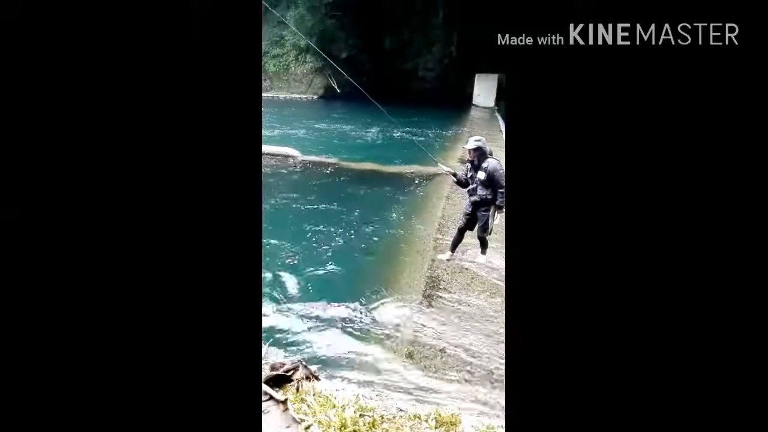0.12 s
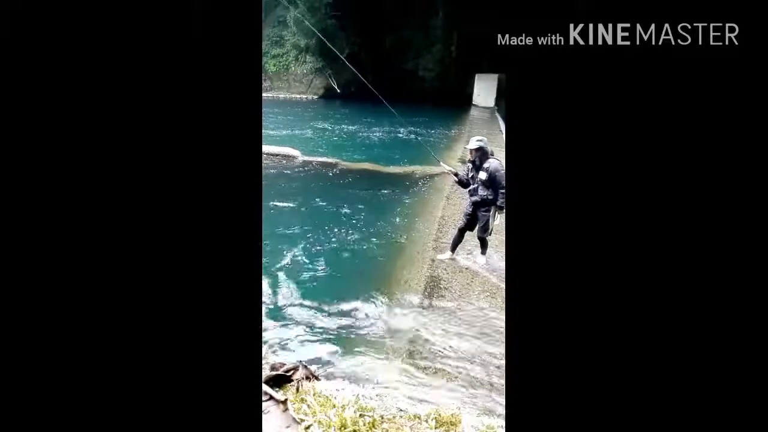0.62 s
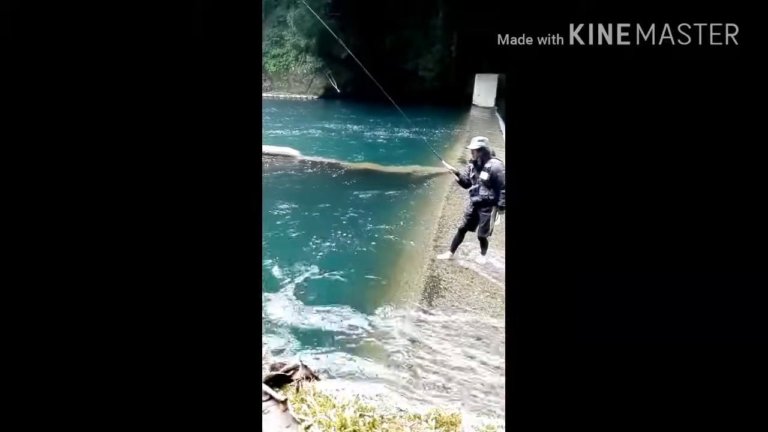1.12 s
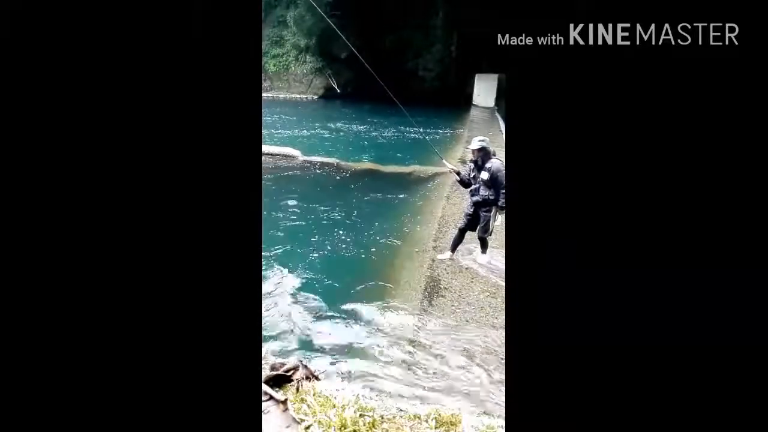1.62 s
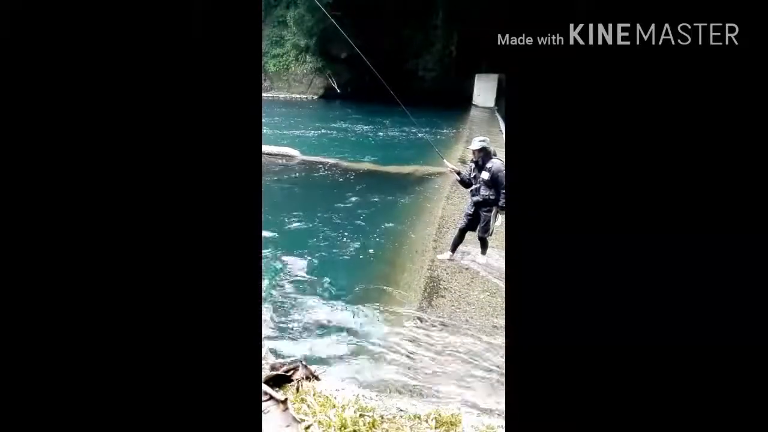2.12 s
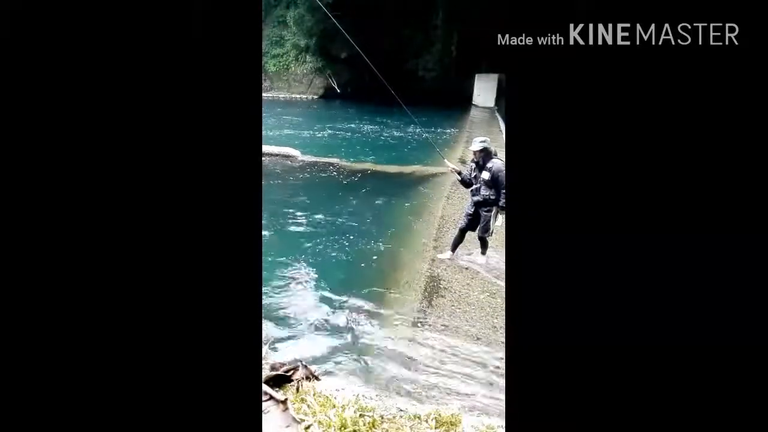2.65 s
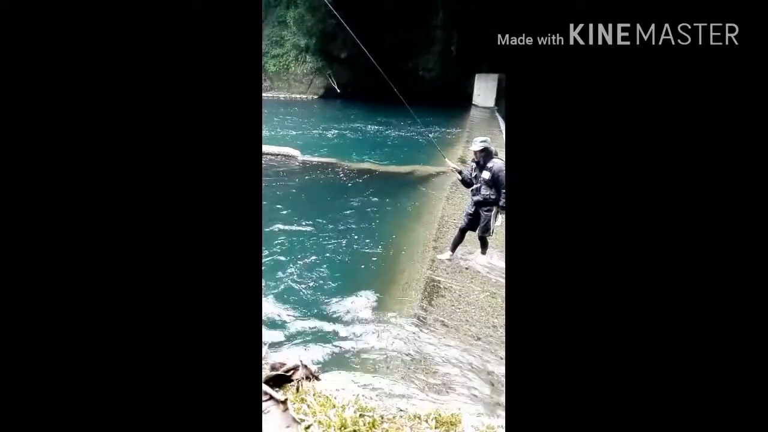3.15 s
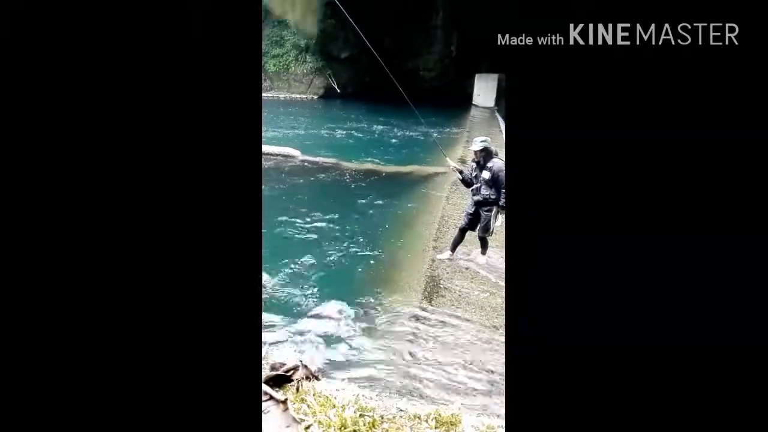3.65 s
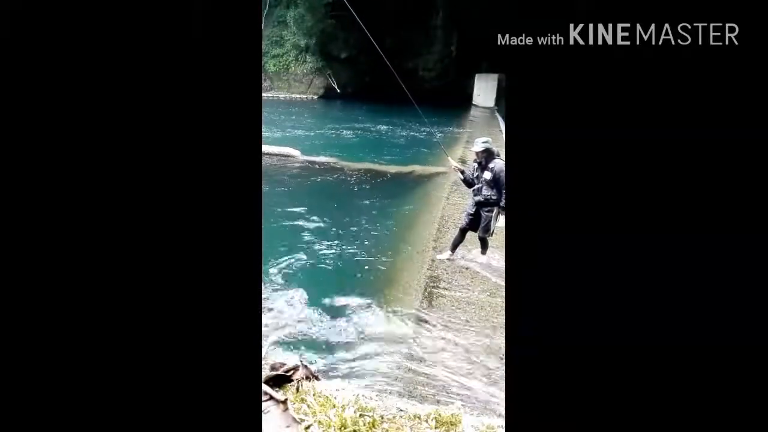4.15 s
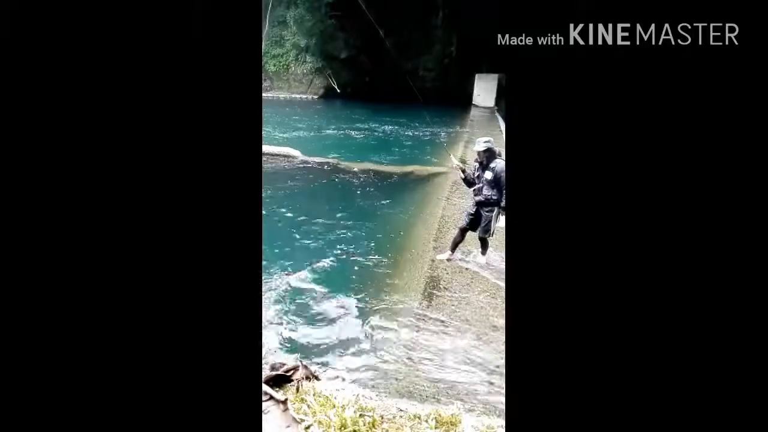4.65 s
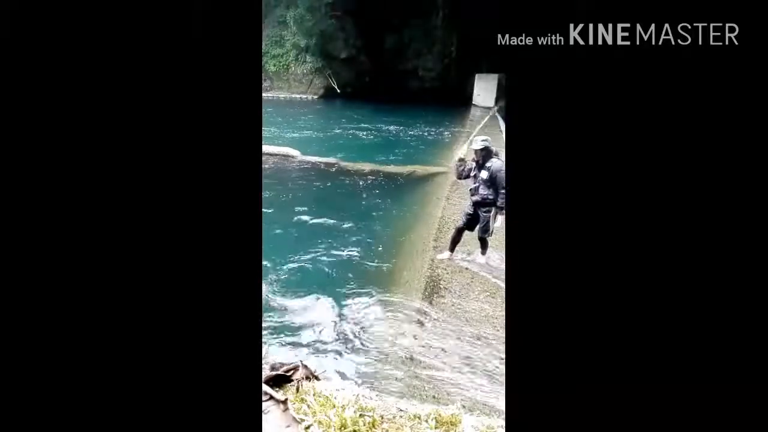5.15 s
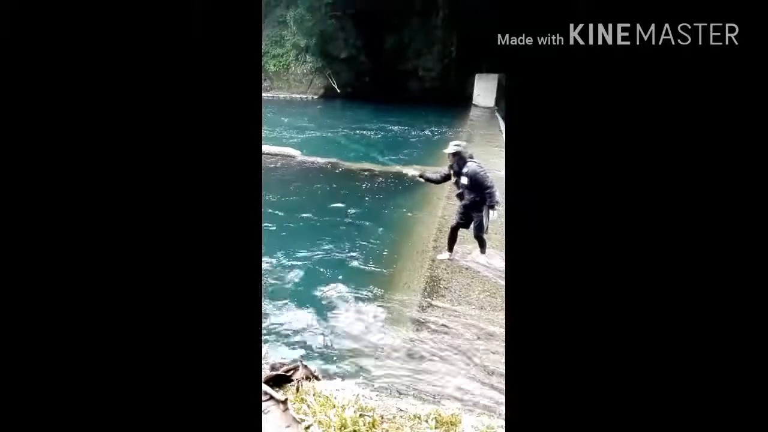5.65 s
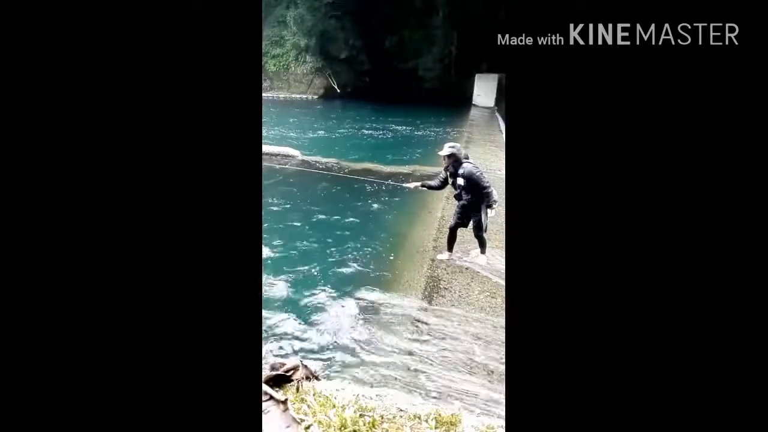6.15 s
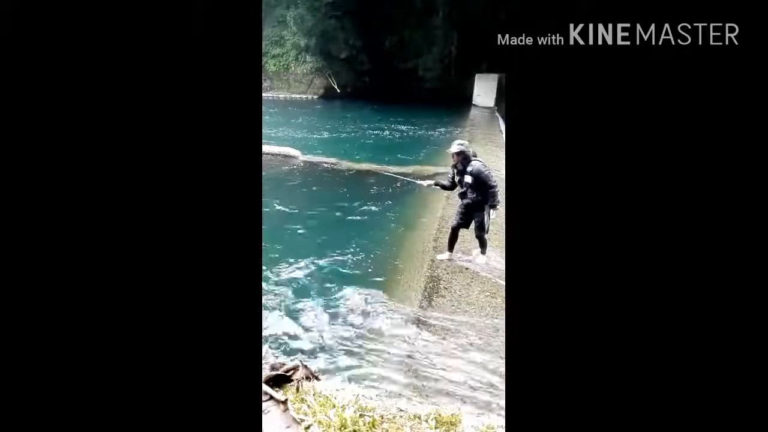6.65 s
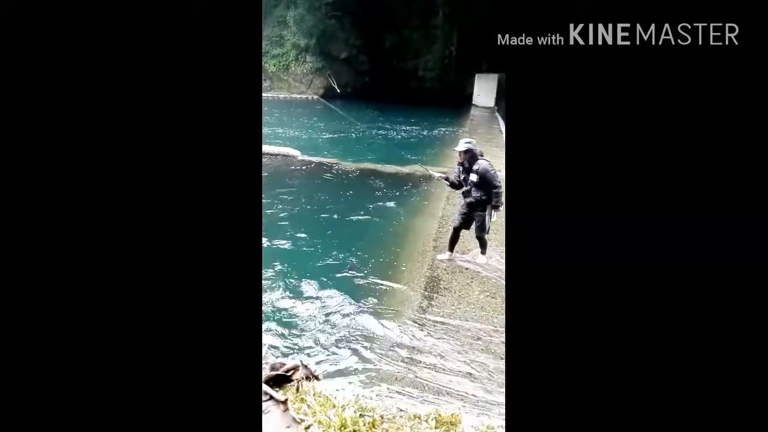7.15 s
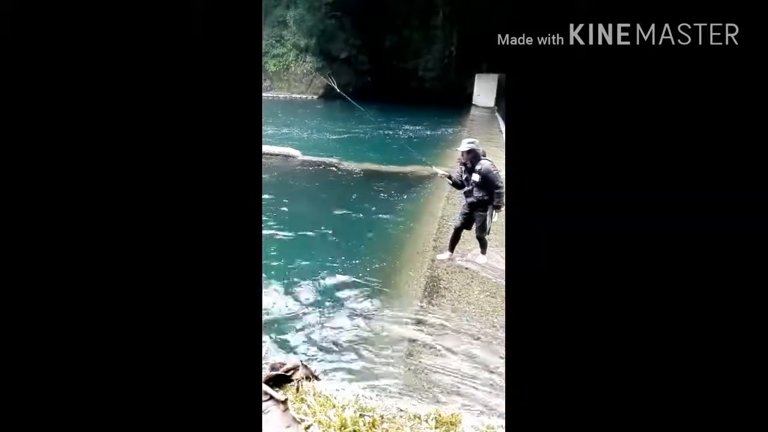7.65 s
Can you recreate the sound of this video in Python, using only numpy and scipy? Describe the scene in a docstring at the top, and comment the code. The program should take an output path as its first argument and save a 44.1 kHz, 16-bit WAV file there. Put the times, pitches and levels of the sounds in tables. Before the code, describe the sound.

From 0 seconds, a full, steady rush of river water pouring over a low weir is already under way. It is smooth, bright noise, strongest in the upper mids, with a faint fizzy grain of tiny rising bubble chirps. A quieter low rumble from the plunging sheet lies below, swelling slightly at about 0.3 seconds. A single soft thump falls near 1.4 seconds. Between 2.4 and 2.6 seconds the rumble rises and several dull, deep thuds cluster together, then it settles while the rush continues unchanged. Around 5.8 seconds another brief low swell brings a soft thump, followed by smaller ones near 5.9, 6.3 and 6.5. The rumble eases, and the even rush runs on to the end at almost 8 seconds. The perspective is close and outdoors, through a small bright microphone, the same in both channels, without noticeable echo.

```python
"""A smooth, bright rush over a low rumble: river water pours over a low weir.
The rush is shaped noise, the blur of countless bubbles in white water, with a faint grain of random chirps.
The falling sheet plunges into the pool: low shaped noise swells and sinks, and decaying sines thump in it.
The rush has the brightness of a small microphone's port resonances; both channels carry the same sound."""
import sys
import numpy as np
from scipy import signal
from scipy.io import wavfile
from scipy.ndimage import uniform_filter1d

SR = 44100
rng = np.random.default_rng(int(sys.argv[2]) if len(sys.argv) > 2 else 0)


def master_out(mix):
    """Clip the mix to full scale and print it as 16-bit PCM to the path in sys.argv[1]."""
    frames = np.transpose(np.atleast_2d(mix))
    ceiling = np.clip(frames, -1, 1)
    pcm = np.round(ceiling * 32767).astype(np.int16)
    wavfile.write(sys.argv[1], SR, pcm)


def volts_from_decibels(level):
    """Turn decibel levels (scalar or array-like) into linear amplitude factors."""
    exponent = np.asarray(level, float) / 20
    return 10 ** exponent


N = 343539  # length [samples]

# How hard the sheet plunges, as rumble level: (time [s], level [dB])
PLUNGE_LEVEL = [(0.0, -30.5), (0.26, -28.5), (0.37, -30), (2.34, -29.5), (2.39, -27), (2.49, -27.5),
                (2.78, -29), (5.71, -31), (5.77, -28), (5.97, -31.5), (6.59, -29), (7.01, -30.5),
                (7.03, -30), (7.79, -29.5)]
# Relative spectrum of the throbbing air clouds: (frequency [Hz], density [dB per Hz])
RUMBLE_SPECTRUM = [(9, -35), (15, -3.5), (60, -1), (95, 0.5), (125, -1.5), (270, -3), (380, -7.5),
                   (520, -14), (900, -38.5)]
# Relative spectrum of the bubbles through the microphone port: (frequency [Hz], density [dB per Hz])
RUSH_SPECTRUM = [(300, -28), (600, -9), (1000, -6), (1620, -3), (1900, -4), (2470, -7.5), (3500, 0.5),
                 (4220, -3), (4950, -.5), (5450, -4), (6510, -14.5), (8620, -23), (10200, -25),
                 (14000, -29)]
# Slugs of water landing in the pool: (time [s], level before the pulse shape [dB], pitch [Hz])
SLUGS = [(1.449, -18, 212), (2.372, -18, 135), (2.41, -18.5, 84), (2.469, -18, 157), (2.558, -16, 136),
         (5.769, -17, 94.2), (5.899, -18, 186), (6.289, -23, 61.9), (6.549, -18.5, 96.9)]


def evened(x):
    """Normalization: dividing by the root mean square gives unit power."""
    return x / np.sqrt(np.mean(x ** 2) + 1e-20)


def spectrum_at(points, hz):
    """A spectral envelope is read by straight lines in level over log frequency."""
    point_hz, level_db = np.transpose(points)
    return np.interp(np.log(hz + 1), np.log(point_hz + 1), level_db)


def patchy_noise(spectrum, patchy_db, patch_s, patch_hz, size):
    """Random short-time spectra sum to noise whose level drifts in patches of time and frequency."""
    hop = size // 4
    hz = np.fft.rfftfreq(size, 1 / SR)
    real, imaginary, patches = rng.standard_normal((N // hop + 5, len(hz), 3)).T
    bins = max(round(patch_hz * size / SR), 1)
    frames = max(round(patch_s * SR / hop), 1)
    patches = uniform_filter1d(patches, bins, 0)
    patches = evened(uniform_filter1d(patches, frames, 1))
    level_db = spectrum_at(spectrum, hz)[:, None] + patchy_db * patches
    spectra = (real + 1j * imaginary) * volts_from_decibels(level_db)
    noise = signal.istft(spectra, nperseg=size, noverlap=size - hop)[1]
    return evened(noise[:N])


def bubbles():
    """Bubble resonance: each size rings as a brief rising chirp, struck in its own random train."""
    sizes, bubbles_per_s = 32, 6000  # the rate is shared by all sizes
    out = np.zeros(N)
    for hz in np.geomspace(800, 9000, sizes):
        turns = np.arange(0, 9, hz / SR)  # time in cycles of the starting pitch
        envelope = turns * np.exp(-turns / 1.5)
        chirp = np.sin(2 * np.pi * turns * (1 + 0.011 * turns)) * envelope
        strength_db = 3.0 * np.minimum(rng.exponential(1, N), 4)
        starts = rng.random(N) < bubbles_per_s / sizes / SR
        train = signal.oaconvolve(volts_from_decibels(strength_db) * starts, chirp)[:N]
        out += volts_from_decibels(spectrum_at(RUSH_SPECTRUM, hz)) * hz * train
    return evened(out)


def rush():
    """Superposition: far bubbles blur into smooth noise, while near ones add a faint grain."""
    rush_db, bubbles_db = -23, -9  # RMS level of the rush; near bubbles against the blur [dB]
    blur = patchy_noise(RUSH_SPECTRUM, patchy_db=0.4, patch_s=0.046, patch_hz=400, size=512)
    return volts_from_decibels(rush_db) * evened(blur + volts_from_decibels(bubbles_db) * bubbles())


def rumble():
    """Collective oscillation: trapped air clouds throb low, and larger ones, from harder plunges, lower."""
    deep_hz = 110  # the deepest throb lies below this
    mean_depth, depth_per_db = 0.5, 0.03  # weight of the deepest throb [0-1], and its rise per dB
    throb = patchy_noise(RUMBLE_SPECTRUM, patchy_db=0.5, patch_s=0.06, patch_hz=120, size=2048)
    lowpass = signal.butter(2, deep_hz, fs=SR, output="sos")
    deep = signal.sosfiltfilt(lowpass, throb)
    level_db = np.interp(np.arange(N) / SR, *np.transpose(PLUNGE_LEVEL))
    depth = np.clip(mean_depth + depth_per_db * (level_db - level_db.mean()), 0, 1)
    # the factor 2 leaves the balance unchanged where both weights are one half
    balanced = 2 * (depth * deep + (1 - depth) * (throb - deep))
    return volts_from_decibels(level_db) * balanced


def thumps():
    """Damped oscillation: each heavier slug of water gives a dull sine pulse that dies within 4 cycles."""
    out = np.zeros(N)
    for start_s, level_db, hz in SLUGS:
        turns = np.arange(0, 4, hz / SR)  # time in cycles
        envelope = turns * np.exp(1 - turns / 0.61)
        thump = np.sin(2 * np.pi * turns) * envelope * volts_from_decibels(level_db)
        part = out[round(start_s * SR):][:len(thump)]
        part += thump[:len(part)]
    return out


def scene():
    """Superposition: rush, rumble and thumps add, and the one sum feeds both channels."""
    return np.tile(rush() + rumble() + thumps(), (2, 1))


def band_limit(x):
    """A steep low-pass at the top of the band."""
    return signal.sosfilt(signal.butter(12, 14440, fs=SR, output="sos"), x)


def record(dry):
    """Band limitation: a steep linear-phase low-pass removes the highest treble."""
    edge = signal.firwin(1023, 14300, window=("kaiser", 11), fs=SR)  # edge at 14300 Hz
    mix = signal.oaconvolve(dry, edge[None], "same")
    return band_limit(mix)


dry = scene()
out = record(dry)
master_out(out)
```